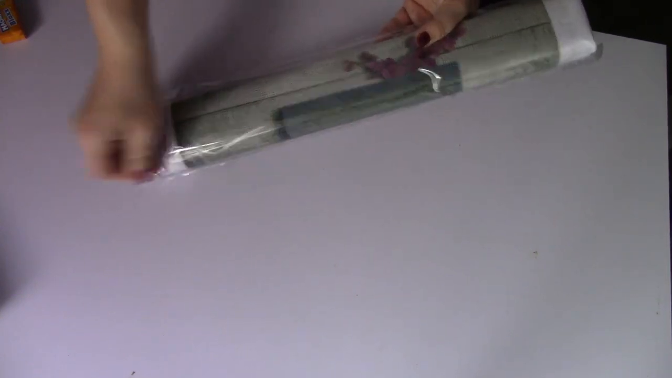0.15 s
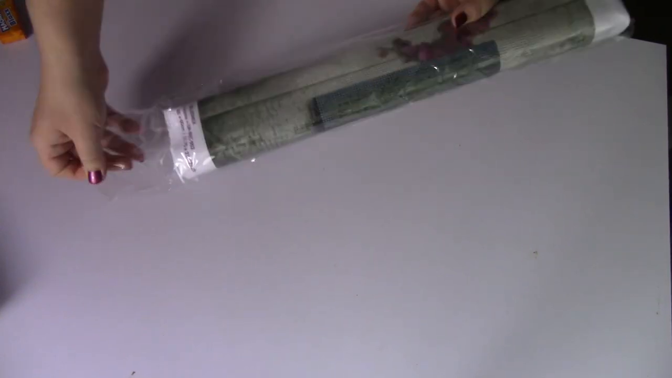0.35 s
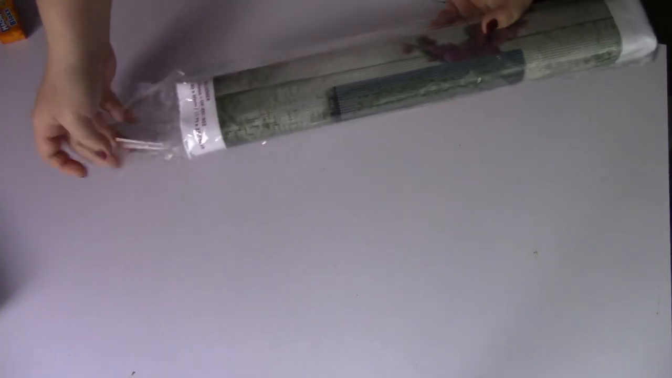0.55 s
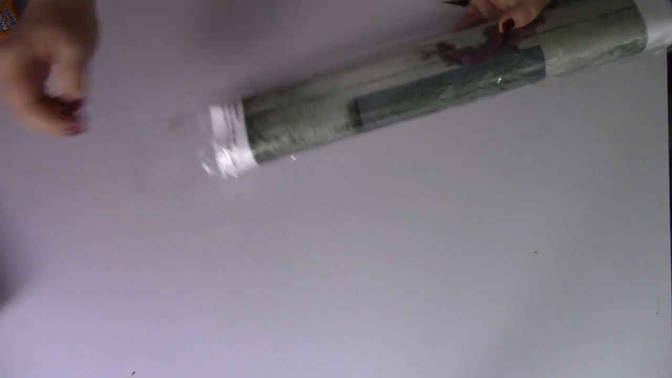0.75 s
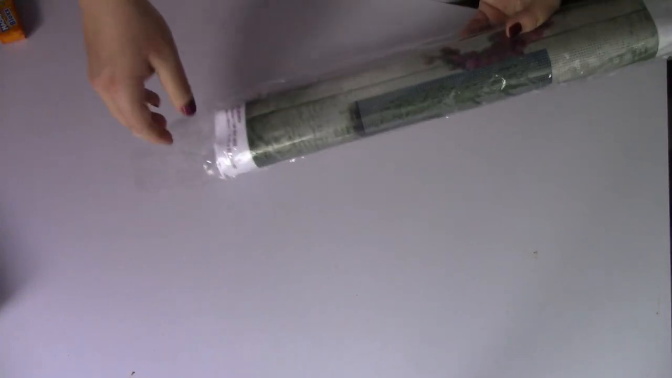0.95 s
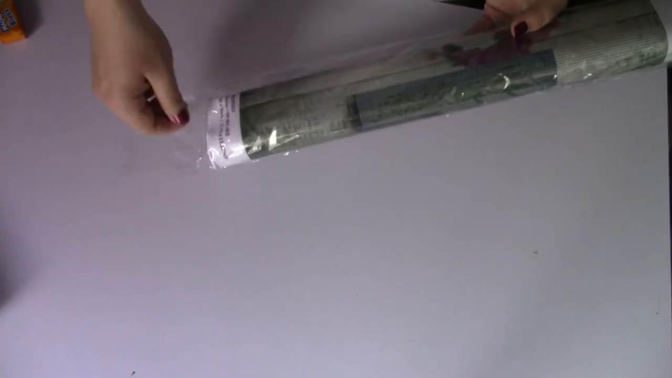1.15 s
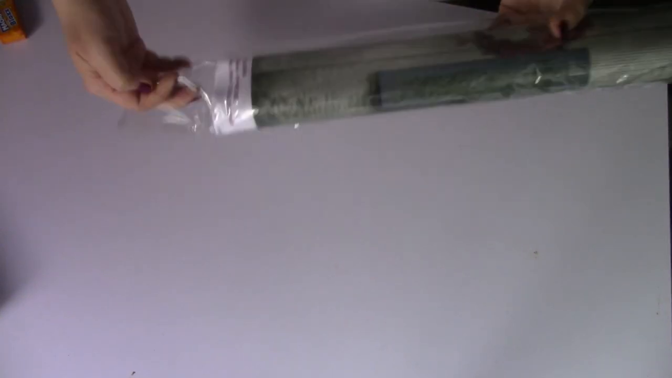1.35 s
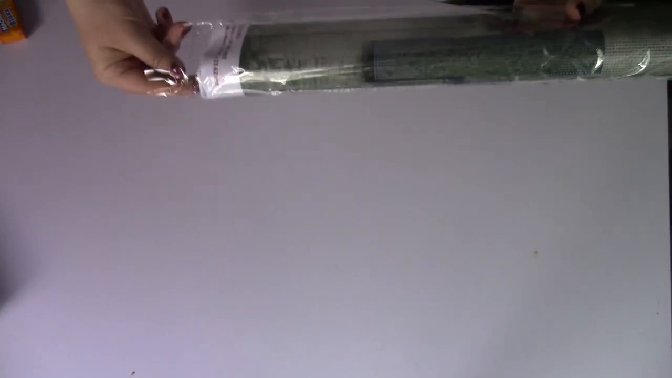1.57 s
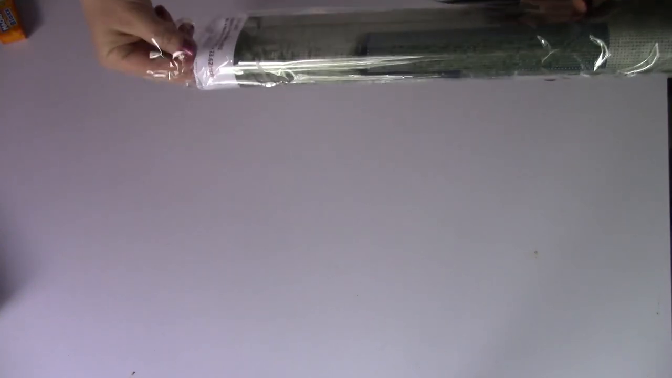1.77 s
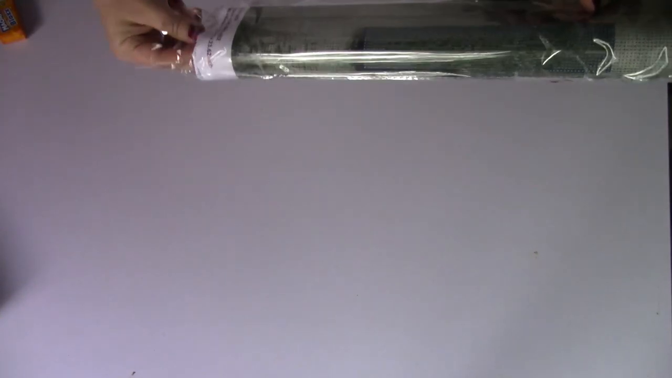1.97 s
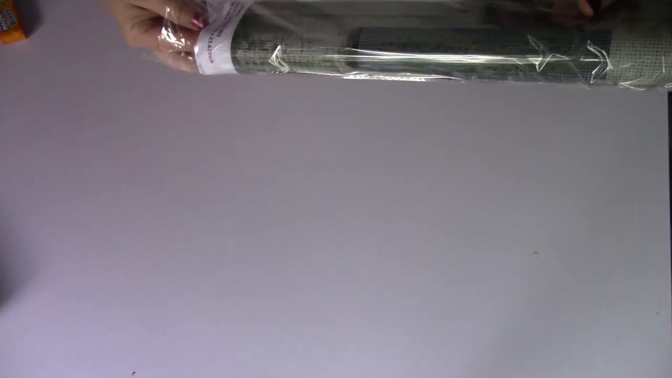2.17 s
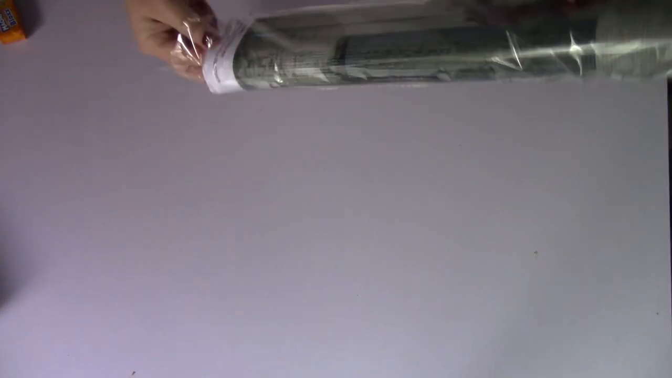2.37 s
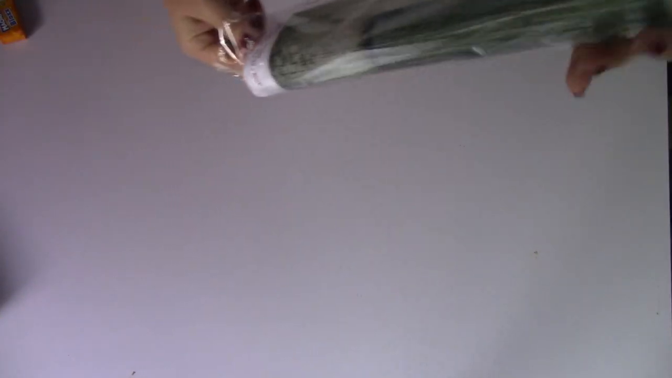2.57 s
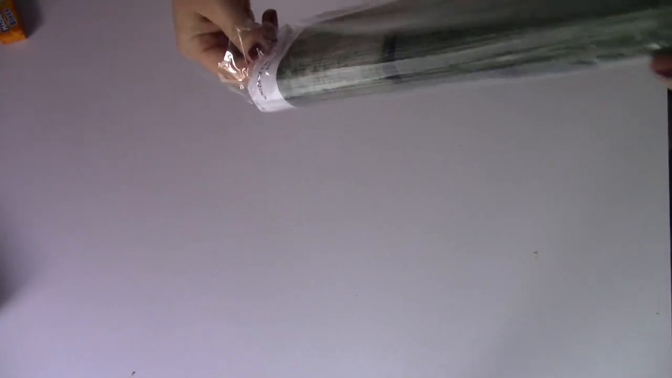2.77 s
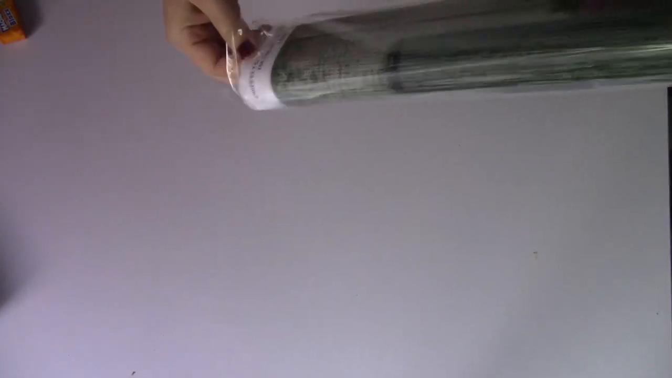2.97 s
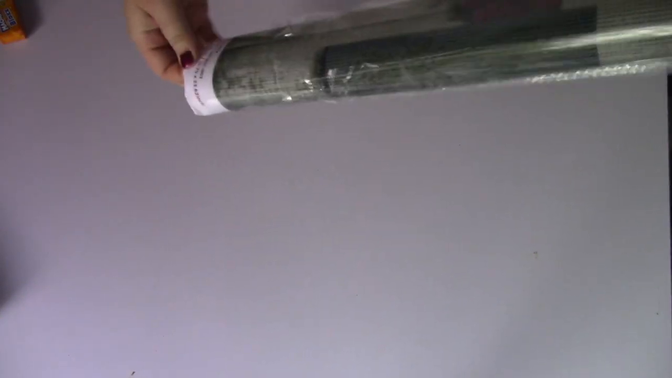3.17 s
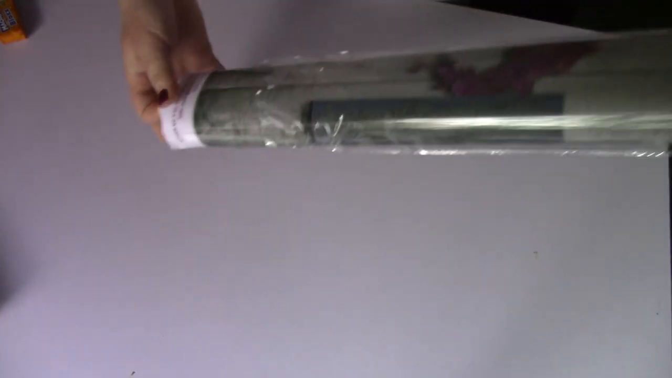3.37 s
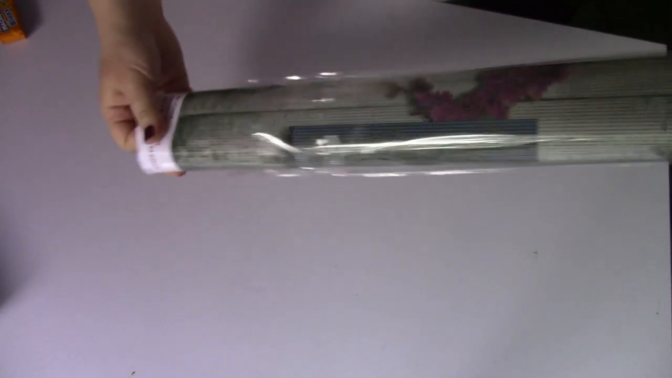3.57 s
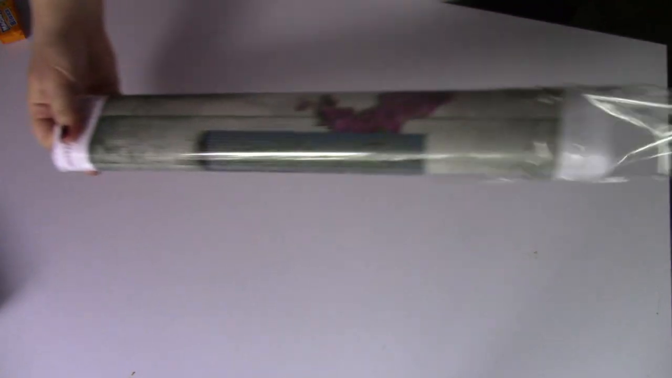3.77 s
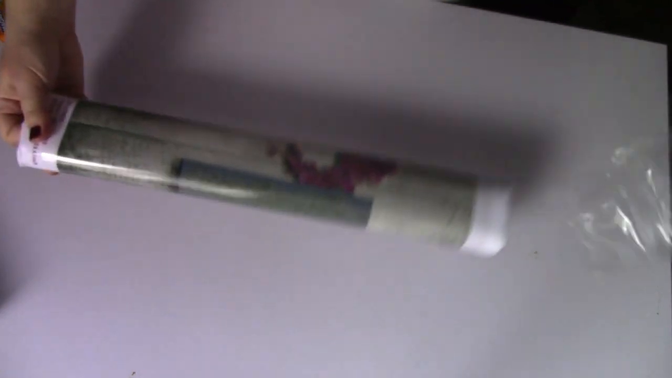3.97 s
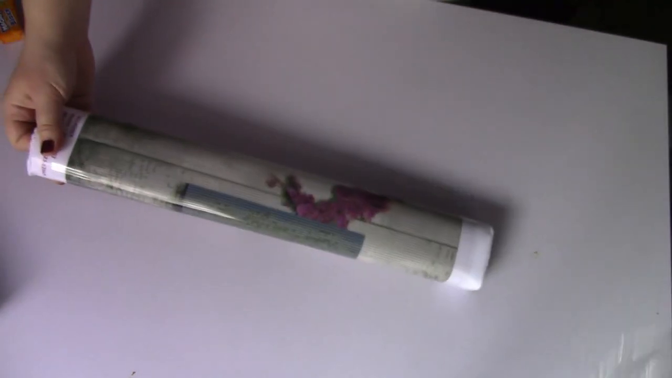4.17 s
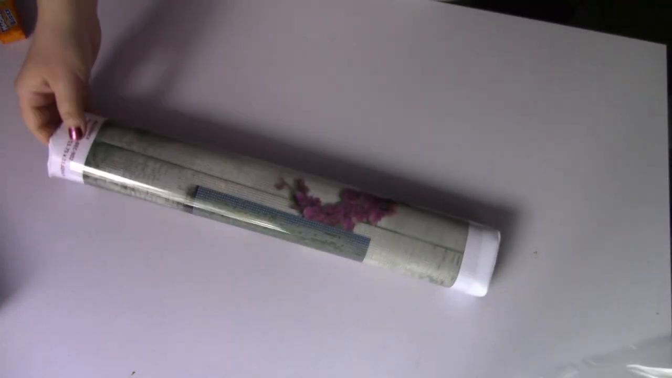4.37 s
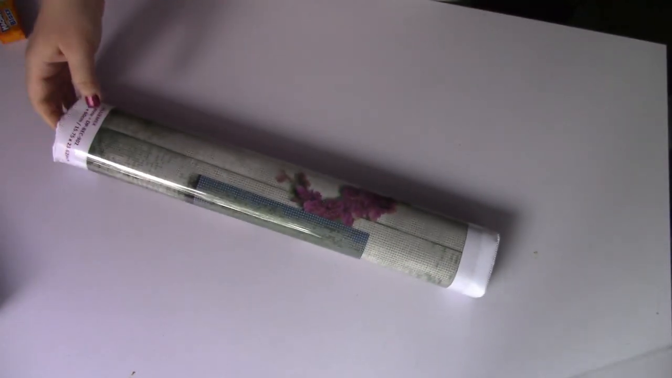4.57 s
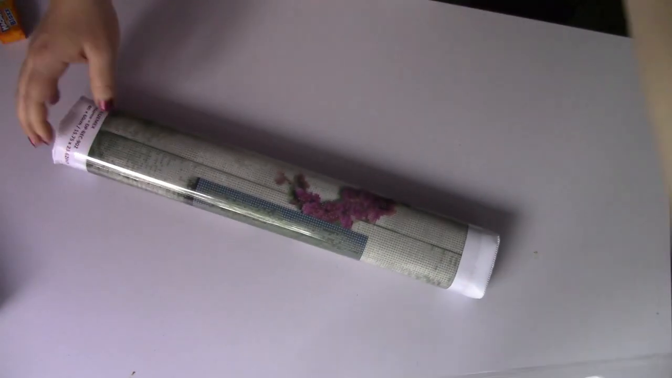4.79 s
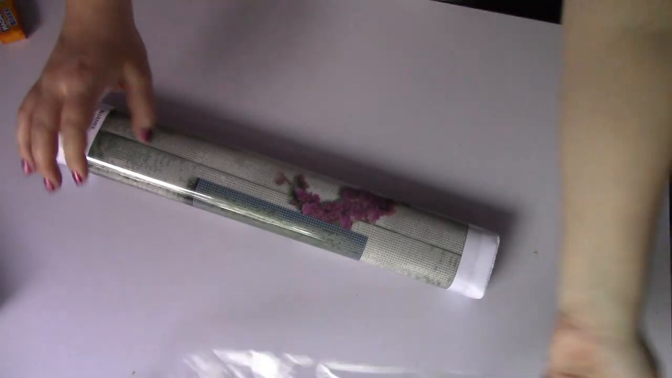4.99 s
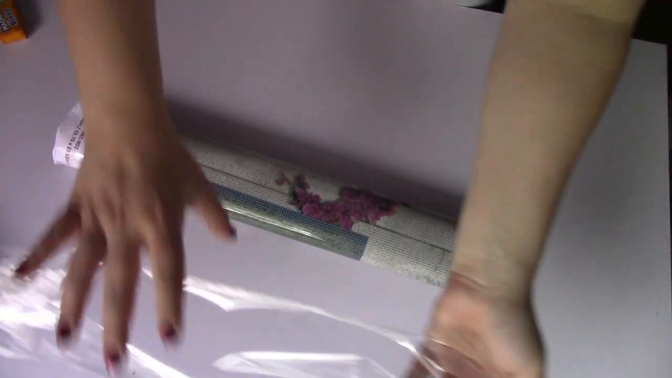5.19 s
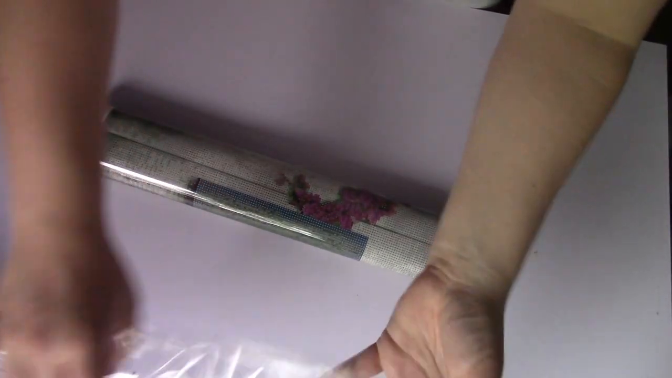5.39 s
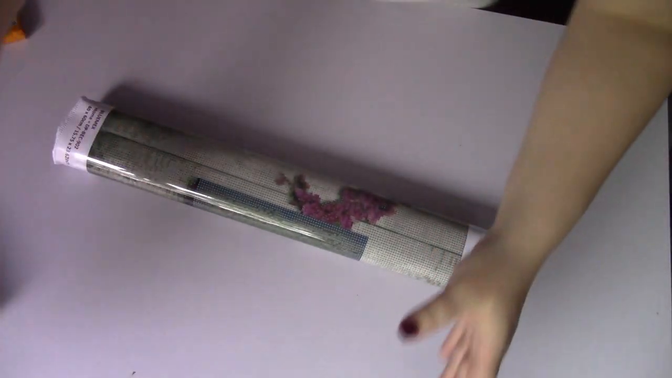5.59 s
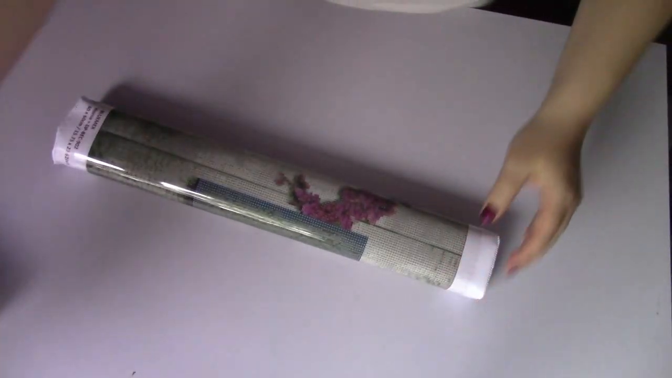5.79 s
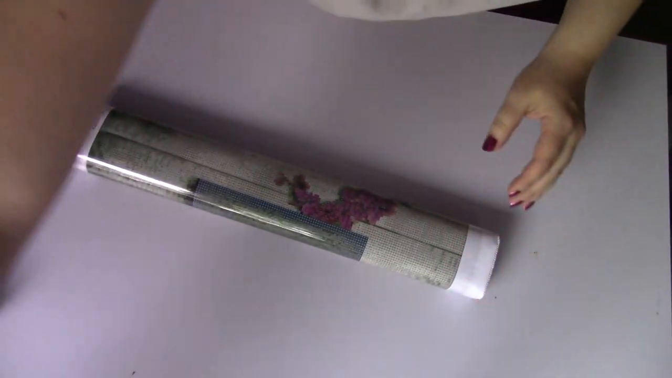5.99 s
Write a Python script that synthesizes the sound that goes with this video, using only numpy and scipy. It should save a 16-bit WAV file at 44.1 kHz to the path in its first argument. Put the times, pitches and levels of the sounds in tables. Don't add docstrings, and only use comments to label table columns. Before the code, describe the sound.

Close to the microphone in a quiet small room, stiff plastic film snaps, crackles and hisses as hands tug a sleeve off a roll. After a brief lull around one second the crinkling becomes nearly continuous, peaks in a hard pull near three seconds, then thins. The roll bumps the table with a low thud, and the empty film rustles as it is moved aside.

```python
import sys
import numpy as np
from scipy import signal
from scipy.fft import rfft, irfft, next_fast_len
from scipy.io import wavfile
from scipy.ndimage import uniform_filter1d, map_coordinates

SR = 44100
rng = np.random.default_rng(int(sys.argv[2]) if len(sys.argv) > 2 else 0)


def master(y):
    cut = np.clip(np.atleast_2d(y).T, -1, 1)
    pcm = np.round(cut * 32767)
    wavfile.write(sys.argv[1], SR, pcm.astype(np.int16))


def volts_from_decibels(level):
    exponent = np.asarray(level, float) / 20
    return 10 ** exponent


N = 266253


def unit(x):
    return x / np.sqrt(np.mean(x ** 2) + 1e-20)


def along(points, hz):
    f, v = np.transpose(points)
    return np.interp(np.log(hz + 1), np.log(f + 1), v)


def curves(rows):
    s, *columns = np.transpose(rows)
    return [np.interp(np.arange(N) / SR, s, column) for column in columns]


def wobble(rate):
    knots = rng.standard_normal(int(N * rate / SR) + 4)
    return map_coordinates(knots, [np.arange(N) * rate / SR])


def coloured(x, spectrum):
    size = next_fast_len(N + 8192)
    gain = volts_from_decibels(along(spectrum, np.fft.rfftfreq(size, 1 / SR)))
    return unit(irfft(rfft(x, size) * gain, size)[:N])


def ring(f, hz, q):
    return 1j * f * hz / q / (hz * hz - f * f + 1j * f * hz / q)


def bursts(s, db, response, t60, size, spike=0):
    t = np.arange(size) / SR
    puff = rng.standard_normal((len(s), size)) * volts_from_decibels(-60 * t / t60)
    puff[:, 0] += spike * np.sign(puff[:, 0])
    gain = response(np.fft.rfftfreq(2 * size, 1 / SR))
    puff = irfft(rfft(puff, 2 * size) * gain)[:, :size]
    puff *= (volts_from_decibels(db) / np.abs(puff).max(axis=1))[:, None]
    at = np.round(s * SR).astype(int)[:, None] + np.arange(size)
    return np.bincount(at.ravel(), puff.ravel(), N + size)[:N]


# time in seconds, peak level in dB, panel ring in Hz, crack over ring in
# dB.
CREASES = [(0.0076, -8, 7190, 3), (0.0209, -11, 3360, -4), (0.0557, -8, 5680, 2),
           (0.0934, -20, 3790, -5), (0.1067, -20, 4950, 4), (0.1361, -17, 4570, 8),
           (0.1421, -13, 5300, 1), (0.1518, -12, 7110, -1), (0.1582, -17, 4350, 17),
           (0.1865, -19, 1980, -17), (0.1951, -12, 2450, -17), (0.2096, -3, 2670, -8),
           (0.3083, -2, 3920, -6), (0.3928, -11, 7190, 10), (0.405, -13, 4780, -2),
           (0.422, -16, 3960, 3), (0.4344, -19, 4480, 4), (0.4525, -9, 5600, 0),
           (0.4673, -15, 4050, 1), (0.4893, -16, 1940, 0), (0.5015, -20, 3140, -7),
           (0.5095, -10, 4520, -8), (0.5453, -18, 3140, 0), (0.5555, -21, 3660, -7),
           (0.5911, -13, 4260, 1), (0.6093, -20, 1770, -3), (0.6247, -15, 2410, -17),
           (0.6348, -15, 2370, 1), (0.6412, -9, 6720, -1), (0.6544, -23, 3190, 1),
           (0.6909, -12, 2280, 0), (0.7337, -25, 2930, -8), (0.7879, -40, 5080, 1),
           (0.8329, -33, 5810, -10), (0.8553, -36, 3960, -8), (0.8816, -40, 2760, -3),
           (0.9076, -25, 3570, -8), (0.9212, -30, 3660, 3),
           (1.049, -39, 5040, -2), (1.0676, -33, 3320, -11), (1.078, -22, 3620, -6),
                    (1.0952, -12, 4520, -2), (1.1019, -12, 5510, 0), (1.1081, -16, 3960, 0),
                    (1.1273, -17, 3620, -6), (1.1453, -20, 2450, -8), (1.156, -15, 3660, 9),
                    (1.1997, -20, 5300, -6), (1.2074, -7, 5000, -5), (1.2298, -12, 3660, -2),
                    (1.2552, -15, 3270, 2), (1.2936, -11, 3660, -7), (1.3154, -12, 3320, -6),
                    (1.3409, -8, 2670, 4), (1.378, -12, 2800, -8), (1.4121, -17, 2800, -10),
                    (1.4183, -12, 3190, 3), (1.4273, -16, 2670, -9), (1.4558, -11, 2580, -4),
                    (1.4769, -12, 2840, -3), (1.5147, -17, 3400, -1), (1.5392, -16, 2370, -8),
                    (1.5858, -11, 2670, -1), (1.6197, -8, 3230, 2), (1.6315, -18, 2240, -3),
                    (1.6396, -10, 4390, 12), (1.6547, -17, 2020, 9), (1.6685, -19, 2330, -2),
                    (1.6968, -19, 5120, -3), (1.7182, -9, 5470, 0), (1.7462, -20, 2450, -1),
                    (1.7606, -10, 7060, 5), (1.7717, -16, 7060, 2), (1.7961, -19, 3490, -3),
                    (1.8022, -18, 2710, -8), (1.817, -15, 5040, -11), (1.839, -21, 7190, 3),
                    (1.8502, -11, 4350, 3), (1.8589, -17, 3400, 2), (1.8709, -17, 4950, -7),
                    (1.876, -17, 7190, 7), (1.8894, -26, 2670, -13),
           (1.9424, -19, 3360, 3), (1.9611, -14, 4260, -2), (1.9681, -16, 2540, 5),
                   (1.9845, -18, 3230, 9), (1.9982, -20, 4570, 4), (2.0234, -10, 5000, -3),
                   (2.0437, -13, 3400, -3), (2.0579, -15, 5170, 8), (2.0774, -14, 7110, 10),
                   (2.0981, -24, 3230, -6), (2.1231, -22, 3790, -4), (2.1393, -22, 6980, -11),
                   (2.1595, -10, 5080, 4), (2.1684, -14, 5680, 7), (2.1844, -20, 5210, 5),
                   (2.1923, -19, 5380, -8), (2.2219, -16, 6500, 5), (2.2284, -19, 3270, -2),
                   (2.2442, -14, 2200, -1), (2.258, -16, 4950, 3), (2.2752, -4, 3620, 0),
                   (2.292, -15, 3620, -11), (2.325, -15, 3450, -3), (2.3467, -14, 5170, 0),
                   (2.3686, -14, 5600, 4), (2.3794, -3, 4310, -1), (2.3859, -13, 5080, 3),
                   (2.3988, -6, 3620, 3), (2.4042, -10, 5040, 8), (2.4148, -12, 6630, 6),
                   (2.4266, -12, 5430, 2), (2.432, -9, 2540, -5), (2.4696, -10, 3190, 2),
                   (2.4867, -15, 4350, -2), (2.5026, -11, 7190, 3), (2.5285, -4, 7190, 16),
                   (2.5439, -13, 4780, 4), (2.561, -18, 3880, -7),
           (2.6091, -11, 3790, -10), (2.624, -8, 7020, 4), (2.6694, -11, 4820, 6),
                   (2.6787, -11, 6120, 4), (2.6887, -13, 3450, -3), (2.7036, -12, 3190, 8),
                   (2.7234, -2, 5730, 1), (2.762, -10, 5730, -3), (2.7773, -20, 3320, -14),
                   (2.7952, -13, 5570, -6), (2.8004, -11, 5810, -3), (2.806, -14, 5860, 13),
                   (2.8142, -16, 2670, -7), (2.8353, -10, 6720, 8), (2.8584, -5, 5430, -3),
                   (2.8726, -12, 2800, -5), (2.8949, -15, 4520, 1), (2.948, -3, 5120, 5),
                   (2.9679, -2, 4690, 3), (2.9785, -9, 5430, 4), (3.0069, -8, 6630, -6),
                   (3.0199, -5, 6720, 2), (3.1983, -13, 7150, 2), (3.2541, -11, 5600, -4),
                   (3.2848, -13, 3270, 4), (3.3433, -18, 4740, 0), (3.4095, -19, 5560, -7),
                   (3.4251, -24, 6240, 2), (3.4596, -22, 4480, -8), (3.4752, -26, 1940, -9),
           (3.5178, -18, 3100, 1), (3.5331, -25, 6240, 1), (3.5404, -19, 3060, -5),
                   (3.5872, -15, 6720, -7), (3.6076, -17, 4180, 3), (3.6888, -11, 4780, -2),
                   (3.7, -13, 5640, -4), (3.7235, -8, 5680, 5), (3.8561, -5, 3060, 1),
                   (3.8654, -8, 3620, -1), (3.9178, -7, 3660, 1), (4.0237, -12, 4610, 7),
                   (4.0416, -14, 4570, -3), (4.0689, -18, 3830, 6), (4.0944, -18, 1980, -6),
                   (4.147, -17, 1460, -2), (4.178, -19, 5080, -3), (4.2126, -16, 4780, -2),
           (4.2608, -23, 4050, -4), (4.2742, -23, 1720, 2), (4.2804, -13, 4480, -6),
                    (4.3178, -20, 7110, -6), (4.3413, -23, 2930, -6), (4.3625, -16, 7110, 0),
                    (4.3892, -20, 3660, -9), (4.4524, -26, 5250, -4), (4.5073, -28, 2840, -5),
                    (4.5657, -17, 1550, -11), (4.5712, -30, 1550, -8), (4.639, -33, 3320, -28),
                    (4.6834, -32, 1680, 2), (4.7621, -40, 1720, -7), (4.9142, -17, 5470, -4),
                    (4.9327, -14, 3790, 1), (5.1774, -28, 7190, 6), (5.199, -19, 3530, -4),
                    (5.2152, -26, 4480, -15), (5.3217, -21, 3490, -9), (5.3302, -25, 3400, -18),
                    (5.3508, -18, 3570, -4), (5.3664, -21, 3570, -3), (5.3814, -8, 6720, 4),
                    (5.3882, -19, 5170, -9), (5.4051, -8, 1680, 7), (5.4203, -6, 4180, -3),
                    (5.4709, -8, 6980, 3), (5.5004, -8, 7150, 1), (5.5492, -17, 1850, -13),
                    (5.629, -17, 4480, -19), (5.64, -5, 3490, -12), (5.6839, -9, 4350, -2),
                    (5.7042, -8, 7150, 0), (5.7912, -21, 3700, -3), (5.8147, -25, 3010, -1),
                    (5.8513, -28, 4520, -5), (5.904, -24, 4910, -3), (5.9754, -20, 5300, 1),
                    (6.0218, -19, 4570, -12),
           (0.2559, -5, 2280, 0),
    (0.2618, -6, 4820, 3),
    (0.2725, -3, 3270, 3),
    (3.0357, -5, 4690, 1),
    (3.0759, -4, 4090, 2),
]
SNAPS = (CREASES)
SNAP_LAG_S = 0.0007


def snaps():
    s, db, hz, crack_db = np.transpose(SNAPS)[:, :, None]
    at, peak_db = s[:, 0] + SNAP_LAG_S, db[:, 0]
    edge_db = crack_db - 5 + 3 * np.log2(hz / 5000)
    chance = rng.random((len(s), 4))
    body_hz = 350 + 700 * chance[:, :1]
    other_hz = 1500 * 2 ** (2.07 * chance[:, 1:2])
    crack_t60 = 0.004 + 0.006 * chance[:, 2:3]
    edge_hz = 8200 + 2000 * chance[:, 3:]

    def panel(f):
        main = ring(f, hz, 1.9) ** 2
        other = volts_from_decibels(-9.5) * ring(f, other_hz, 1.2) ** 2
        return main - other + volts_from_decibels(edge_db) * ring(f, edge_hz, 0.9) ** 2

    def spread(f):
        film = ring(f, 5000, 0.75) * ring(f, 4600, 0.097)
        return film + 0.34 * ring(f, hz, 2.6) + volts_from_decibels(edge_db - 8) * ring(f, edge_hz, 1.6)

    crack = bursts(at, peak_db, panel, crack_t60, size=512, spike=4)
    after = bursts(at, peak_db - 12, spread, 0.03, size=2048)
    body = bursts(at, peak_db - 27, lambda f: ring(f, body_hz, 1.74) ** 2, 0.012, size=1024)
    return crack + after + body


def loosening():
    t60_s, share, span_s = 0.1, 0.4, 0.1
    s, db = np.transpose([row[:2] for row in SNAPS])
    kicks = np.bincount(np.round((s + SNAP_LAG_S) * SR).astype(int), volts_from_decibels(db), N)
    decay = volts_from_decibels(-60 * np.arange(SR // 2) / SR / t60_s)
    freed = np.abs(signal.fftconvolve(kicks, decay)[:N])
    ratio = freed / (np.abs(uniform_filter1d(freed, int(span_s * SR))) + 1e-4)
    return 10 * np.log10(1 - share + share * ratio ** 2)


# start in seconds, swell in seconds, crackle level in dB, fade in dB a second.
TUGS_ON_ROLL = [(0, 0.00073, -22.5, 74), (.18, 0.012, -26.5, 59), (0.206, 0.0052, -16, 47),
                (.44, 0.012, -59, 32.5), (.58, 0.081, -27.5, 164.5), (.735, 0.0038, -80, 65),
                (1.05, 0.072, -27.5, 125), (1.194, 0.012, -22, 168), (1.256, 0.11, -20, 238),
                (1.401, 0.04, -23, 66.5), (1.567, 0.049, -27.5, 131), (1.69, 0.027, -29.5, 71),
                (1.93, 0.029, -33, 19), (2.155, 0.015, -33.5, 226), (2.218, 0.014, -39, 67),
                (2.316, 0.13, -26, 44), (2.596, 0.041, -23, 31), (2.909, 0.036, -19, 84),
                (2.961, 0.13, -11.5, 95.5), (3.05, 0.047, -27, 81.5), (3.22, 0.048, -24, 168),
                (3.4, 0.012, -36, 144), (3.455, 0.011, -37.5, 116.5), (3.527, 0.14, -20.5, 40),
                (3.758, 0.012, -16, 55.5), (3.8, 0.067, -18, 80.5)]
# start in seconds, swell in seconds, crackle level in dB, fade in dB a second.
EMPTY_SLEEVE_MOVES = [(4.258, 0.05, -29, 77), (4.562, 0.0091, -47, 107), (4.678, 0.0033, -46, 127),
                      (4.912, .005, -34, 106), (5.0, 0.12, -50, 13), (5.17, 0.049, -40, 234),
                      (5.315, 0.13, -26.5, 72), (5.461, 0.07, -25, 210.5), (5.625, 0.0043, -30.5, 74),
                      (5.647, 0.034, -21, 198.5), (5.775, .01, -41.5, 40.5), (6.008, 0.014, -35, 135.5)]


def pull():
    swell_db = 9.5
    start, swell, db, fade_db = np.transpose(TUGS_ON_ROLL + EMPTY_SLEEVE_MOVES)[:, :, None]
    t = np.arange(0, N + 64, 64) / SR
    past = t - start - swell
    level_db = db + np.where(past < 0, swell_db * past / swell, -fade_db * past)
    total = np.sum(volts_from_decibels(2 * level_db) * (t >= start), axis=0)
    return np.interp(np.arange(N) / SR, t, 10 * np.log10(total + 1e-10))


def ticks(film_db, count):
    chance = rng.random((count, 4))
    at = (chance[:, 0] * (N - 1)).astype(int)
    pulled_db = 1.1 * (film_db[at] + 30) - 30
    db = pulled_db + 8 - 5 * chance[:, 1]
    click_hz = 2800 * 2 ** (1.4 * chance[:, 2:3])
    click = lambda f: ring(f, click_hz, 3.6) + 0.55 * ring(f, 9000, 1.0)
    return bursts(at / SR, db, click, 0.002 + 0.004 * chance[:, 3:], size=512)


def crackle(count, spread_db):
    chance = rng.random((count, 4))
    size_db = -spread_db * np.log(chance[:, 1] + 0.035)
    hz = 1500 * 2 ** (3.55 * chance[:, 2:3])
    panel = lambda f: ring(f, hz, 0.87) + 0.47
    t60 = 0.0032 + 0.0043 * chance[:, 3:]
    return unit(bursts(chance[:, 0] * N / SR, size_db, panel, t60, size=320))


# frequency in Hz, density in dB per Hz.
FILM_COLOUR = [(530, -12.5), (900, -14.5), (1490, -5.5), (1620, -5), (1810, -1), (4310, 1.5), (6250, -0.5),
               (8760, 3), (12400, -5), (14200, -4), (16000, -10.5)]
# frequency in Hz, density in dB per Hz.
SLEEVE_COLOUR = [(53, -59), (92, -6), (118, -4), (179, -9), (251, 3.5), (422, 4.5), (1270, 0), (2000, -8.5),
                 (2600, -13.5), (4400, -120)]
# time in seconds, brightness in dB, slackness in dB.
HAND_GRIP = [(0, 1, 2), (.25, -3.5, 6.5), (.9, -0.5, 2), (1.3, -1.5, 2), (2, -1, 4.5), (2.4, 3.5, 1),
             (2.8, -1.5, -7.5), (3.1, 0.5, 0.5), (3.4, 2, 2.5), (3.8, -0.5, 0.5), (4.2, -4.5, 2),
             (4.6, -2, 6), (5.1, -2, -1.5), (5.5, -6, -0.5), (6.04, -1, -3)]


def rustle(film_db):
    tilt_db, slack_db = curves(HAND_GRIP)
    sleeve_db = -42 + 0.85 * (film_db + 29.5) + slack_db
    clumps_db = 1.7 * wobble(65) + 1.6 * wobble(140)
    pulled_db = np.clip(0.5 * (film_db + 28.0), -5, 5)
    resting_db = np.clip(-0.8 * (film_db + 33.5), 0, 14)
    hiss = volts_from_decibels(pulled_db + resting_db)
    bed = crackle(count=5000, spread_db=5.0) + hiss * rng.standard_normal(N)
    clumps_db = clumps_db * (1 - 0.09 * np.maximum(pulled_db, 0))
    bed = volts_from_decibels(clumps_db) * bed / np.sqrt(1 + hiss ** 2)
    film = coloured(bed, FILM_COLOUR)
    bright = signal.sosfilt(signal.butter(1, 6000, "high", fs=SR, output="sos"), film)
    film = volts_from_decibels(-tilt_db) * (film - bright) + volts_from_decibels(tilt_db - 0.87 * resting_db) * bright
    flaps = bed + volts_from_decibels(3 + 2.5 * wobble(30) + 3 * wobble(70)) * rng.standard_normal(N)
    return volts_from_decibels(film_db - 5.0) * film + volts_from_decibels(sleeve_db - 4.0) * coloured(flaps, SLEEVE_COLOUR)


# time in seconds, peak level in dB, knock in Hz, upper mode (hum) in dB, lower mode (boom) in dB.
TABLE_KNOCKS = [(0.052, -53, 326, -64, -67), (0.206, -35, 244, -48, -34.5), (0.683, -38, 393, -56, -76),
                (1.668, -24.5, 755, -80, -68), (1.299, -21, 564, -51.5, -56), (1.539, -24.5, 770, -85, -66),
                (1.62, -21, 506, -72, -70), (1.795, -23.5, 704, -77, -64), (2.158, -25.5, 616, -64, -65),
                (2.337, -31.5, 666, -77, -72), (2.621, -31, 797, -50.5, -48), (3.04, -23, 870, -49.5, -53),
                (3.099, -18.5, 659, -72, -54), (3.32, -28.5, 208, -42, -57), (3.516, -21, 470, -75, -61),
                (3.623, -24, 483, -51, -63), (3.78, -48, 783, -62, -63), (3.918, -33.5, 780, -44.5, -41),
                (4.093, -15.5, 430, -38, -19.5), (4.433, -24.5, 580, -75, -55),
                (4.566, -32, 1400, -74, -50), (5.135, -43.5, 250, -77, -70), (5.322, -40.5, 230, -56, -47),
                (5.406, -33.5, 220, -65, -45), (5.67, -27, 376, -42.5, -35)]
# frequency in Hz, 60 dB decay in seconds.
LOW_MODES = [
    (119.8, 0.56),
    (32, 0.49),
]


def knocks():
    boom_lag_s = 0.0087
    s, db, hz, hum_db, boom_db = np.transpose(TABLE_KNOCKS)
    knock = bursts(s, db, lambda f: ring(f, hz[:, None], 1.1) ** 2, 0.028, size=3072)
    film_slap = bursts(s, db - 5, lambda f: ring(f, 1500, 0.8) ** 2, 0.03, size=3072)
    push = bursts(s, hum_db + 11, lambda f: ring(f, 140, 0.6) * ring(f, 80, 0.55), 0.035, size=3072)
    out = knock + film_slap + push
    t = np.arange(SR) / SR
    for (mode_hz, t60), level_db in zip(LOW_MODES, (hum_db, boom_db)):
        blows = np.bincount(np.round((s + boom_lag_s) * SR).astype(int), volts_from_decibels(level_db - 2.5), N)
        swell = 1 - np.exp(-t / 0.006)
        mode = volts_from_decibels(-60 * t / t60) * swell * np.sin(2 * np.pi * mode_hz * t)
        out = out + signal.fftconvolve(blows, mode)[:N]
    return out


# frequency in Hz, 60 dB decay in seconds.
ROOM_DECAY = [(200, 0.34), (1500, 0.36), (5000, 0.18), (14000, 0.088)]


def room(x, pieces):
    out = np.zeros(N + SR)
    for part in np.array_split(np.arange(N), pieces):
        hz, t, z = signal.stft(rng.standard_normal(SR // 2), SR, nperseg=256)
        decay = volts_from_decibels(-60 * t / along(ROOM_DECAY, hz)[:, None])
        tail = signal.istft(z * decay, SR, nperseg=256)[1]
        wet = signal.fftconvolve(x[part], tail / np.linalg.norm(tail))
        out[part[0] + 130:][:len(wet)] += wet
    return out[:N]


# frequency in Hz, density in dB per Hz.
QUIET_COLOUR = [(88, -29), (150, 1), (422, -14), (730, -21), (1900, -21), (11900, -34), (16000, -38)]
# frequency in Hz, density in dB per Hz.
RUMBLE_COLOUR = [(15, 6.5), (28, 22), (50, 14), (90, -2), (200, -69)]
# time in seconds, rumble level in dB.
CAMERA_SHAKE = [
    (0.0, -53.5),
    (1.65, -62.5),
    (3.95, -60.5),
    (6.04, -61),
]


def background():
    lumps = volts_from_decibels(curves(CAMERA_SHAKE)[0] + 2.2 * wobble(7.5))
    hush = volts_from_decibels(-64) * coloured(rng.standard_normal(N), QUIET_COLOUR)
    return hush + lumps * coloured(rng.standard_normal(N), RUMBLE_COLOUR)


def scene():
    pull_db = pull()
    snap_hold = np.clip(3 - (pull_db + 32) / 7, 0, 1)
    film_db = pull_db + snap_hold * loosening()
    sharp = snaps() + ticks(film_db, count=70)
    bed = rustle(film_db)
    bumps = knocks()
    wet = volts_from_decibels(-10.5) * room(sharp + volts_from_decibels(-12.5) * bed + volts_from_decibels(3) * bumps, pieces=24)
    return (sharp + bed + bumps + wet + background())[None]


def roll_off(x):
    return signal.sosfilt(signal.butter(12, 16970, fs=SR, output="sos"), x)


def record(dry):
    rounded = dry / (1 + np.abs(dry / 0.8) ** 3) ** (1 / 3)
    band_limit = signal.ellip(10, 0.05, 55, 15800, fs=SR, output="sos")
    mix = signal.sosfilt(band_limit, rounded)
    return roll_off(mix)


dry = scene()
out = record(dry)
master(out)
```